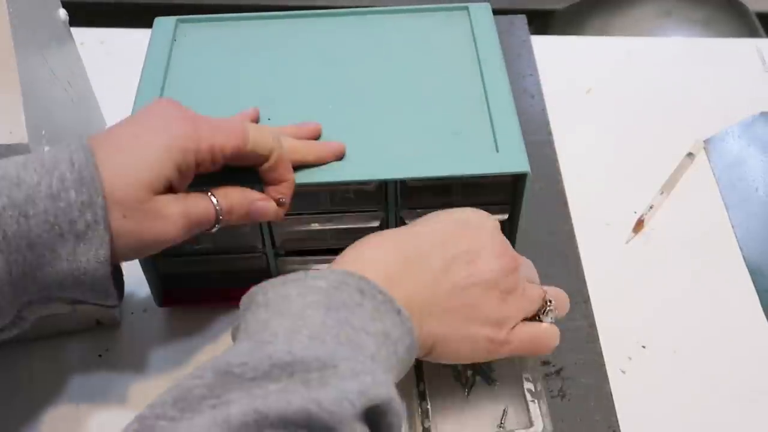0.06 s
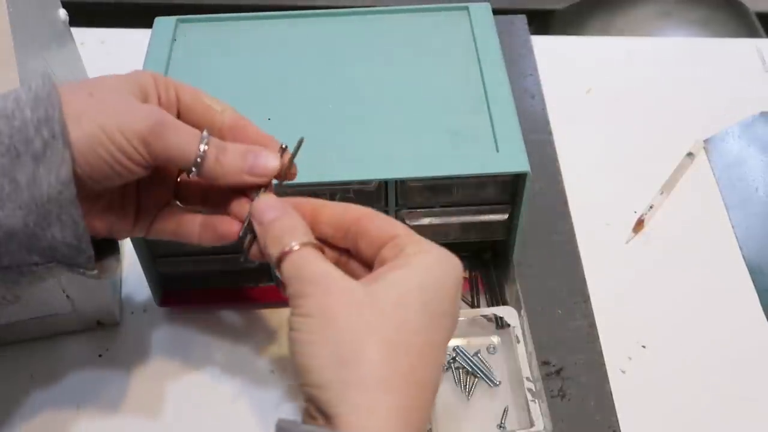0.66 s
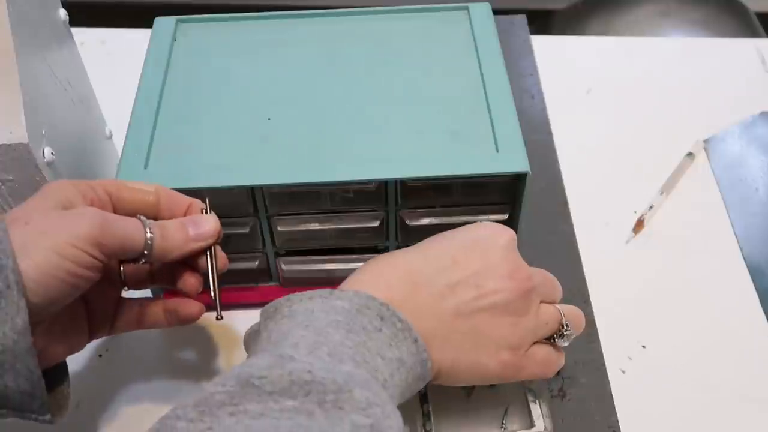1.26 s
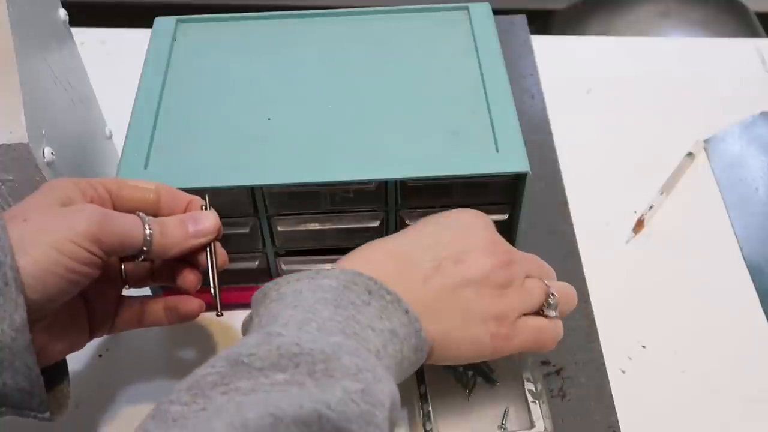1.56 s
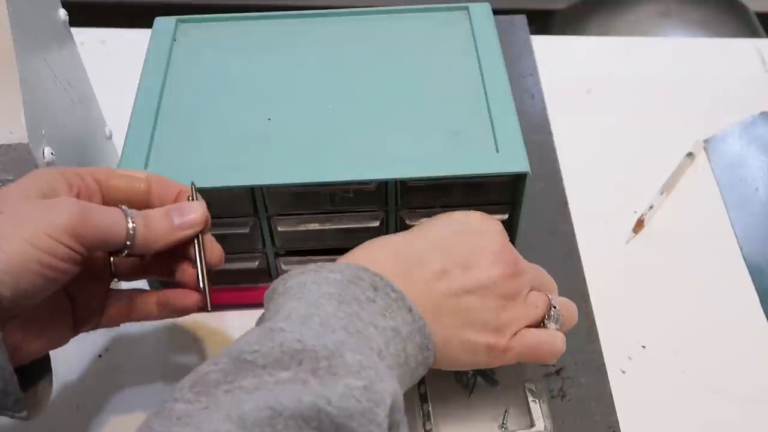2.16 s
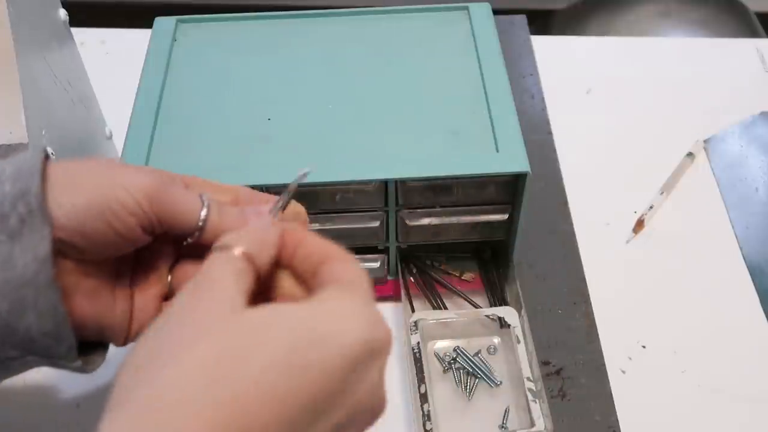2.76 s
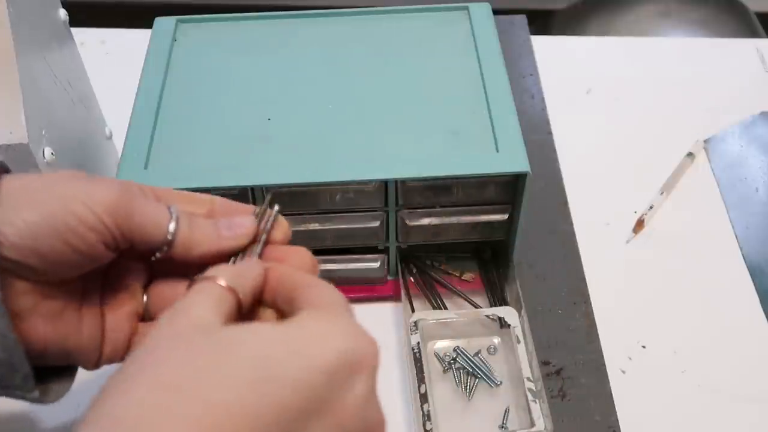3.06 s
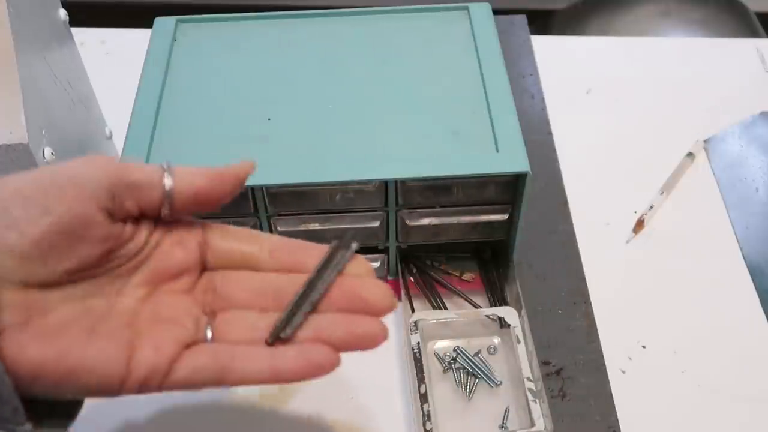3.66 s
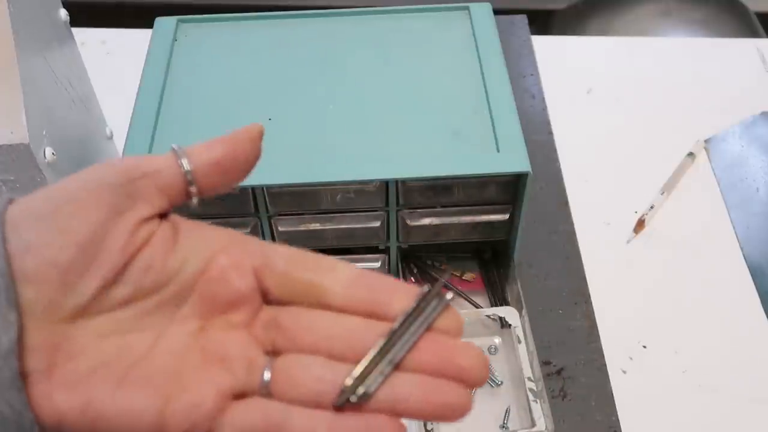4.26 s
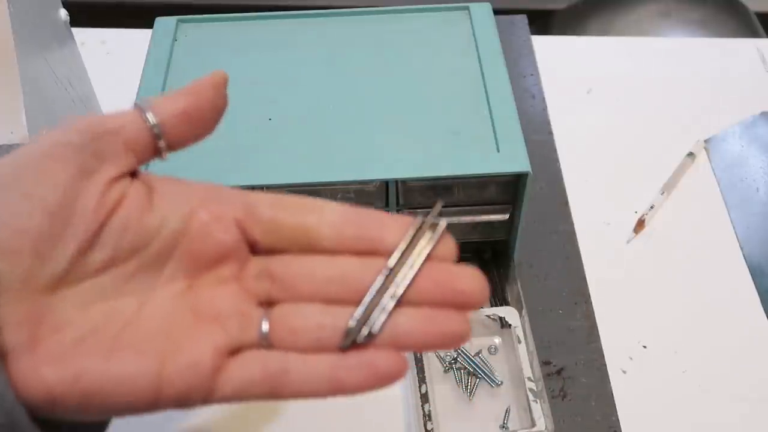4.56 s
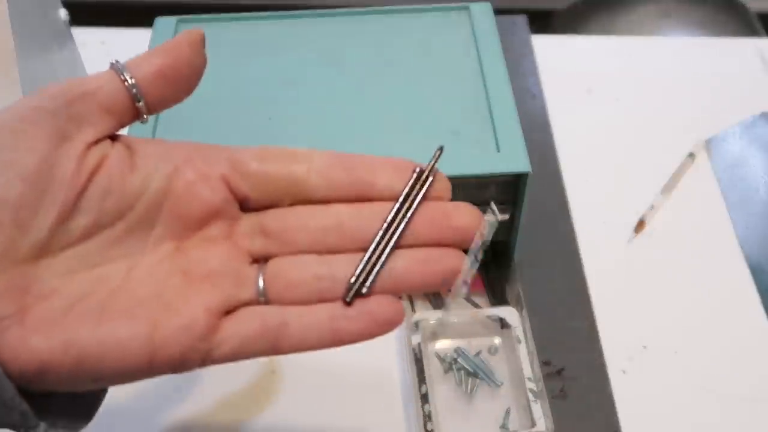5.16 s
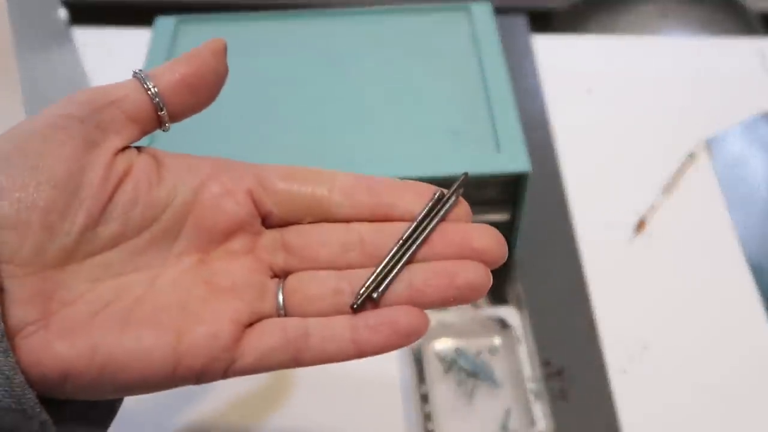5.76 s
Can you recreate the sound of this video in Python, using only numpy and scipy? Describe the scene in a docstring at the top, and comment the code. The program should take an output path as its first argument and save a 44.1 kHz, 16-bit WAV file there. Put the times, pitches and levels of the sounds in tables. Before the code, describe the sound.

A low rumble and faint mains hum run throughout in a small workroom. In the first quarter second, close by, steel nails scrape and click against a small plastic drawer, followed by a soft low thud and a light brush at 0.4 seconds. From 1.1 to 2.3 seconds comes busier rummaging: short scrapes and sharp plastic clacks with dull thuds underneath, strongest around 1.3, 1.75 and 2.05 seconds. Then it turns quiet. Sleeve and skin brush softly near 2.7 and 3.7 seconds, and nails tick faintly together in the palm between 3 and 3.8 seconds. After another soft brush, one nail hits the floor at 5.5 seconds with a loud knock and clink, slightly further off and with more echo. It rings with a thin, high, fluttering tone in the air, lands sharply again at 5.75, and makes several quicker, lighter, metallic bounces until about 6 seconds.

```python
"""A small workroom, with a low rumble and a mains hum. Close by, fingers pick steel nails out of a
small plastic parts drawer: the nails scrape and knock on its walls, with some soft low thuds, and
sleeve and skin brush softly. The nails touch faintly in the palm. Then one slips off, hits the
floor and bounces, ringing as it tumbles through the air."""
import sys
import numpy as np
from scipy import signal
from scipy.fft import rfft, irfft, next_fast_len
from scipy.io import wavfile

SR = 44100
rng = np.random.default_rng(int(sys.argv[2]) if len(sys.argv) > 2 else 0)


def store_pcm(level_fs):
    """Save levels as 16-bit WAV."""
    pcm = np.round(np.clip(level_fs, -1, 1) * 32767).astype(np.int16)
    wavfile.write(sys.argv[1], SR, np.atleast_2d(pcm).T)


N = 265834

# A "peak" is a pitch that stands out; a "decay" is the time a sound takes to fall by 60 dB.
# nails drag along the drawer:
# (start [s], end [s], level [dB], peak [Hz], peak height [dB], steel over plastic [dB])
DRAWER_SCRAPES = [(0, 0.24, -47, 3730, 22, -6.5), (1.088, 1.173, -47, 1470, 3, -13),
                  (1.476, 1.559, -44.5, 1025, 16, -10), (1.688, 1.761, -36, 1650, -2, -14),
                  (1.752, 1.848, -49, 2750, 4, -5), (1.882, 2.045, -48, 1250, 12, -9.5),
                  (2.059, 2.187, -45, 2680, 3, -11), (2.194, 2.317, -54.5, 3160, 11, -11.5)]
# a nail knocks the drawer:
# (time [s], plastic clack [dB], hardness: steel tick over clack [dB], peak [Hz], peak height [dB])
DRAWER_KNOCKS = [(.027, -18, -8, 3850, 16), (.037, -19, -8, 3800, 12), (.1, -5.5, -4, 2150, 26),
                 (0.1015, -11, -1, 3300, 24), (.118, -16, -13, 2200, 27), (0.1722, -12.5, -9, 3700, 29),
                 (0.178, -17, -5, 2100, 20), (0.224, -17.5, -3, 4270, 23), (0.228, -23.5, -8, 1200, 18),
                 (1.117, -19.5, -7.5, 1580, 13), (1.1753, -8.5, -24, 1600, 12),
                 (1.1779, -5.5, -28, 2480, 16), (1.259, -13, -6, 3900, 11), (1.2707, 0.5, -2.5, 1600, 1),
                 (1.2738, -6, -11, 3500, 23), (1.3447, 3.5, -1, 2870, 14), (1.3493, -3.5, -4.5, 3000, 3),
                 (1.484, -21.5, -20, 1040, 28), (1.6753, -18, -14, 2860, 17), (1.695, -12, -20, 2850, 8),
                 (1.7025, -6.5, -23, 1500, 9), (1.7127, -6.5, -25, 2780, 4), (1.7229, -4, -27, 1730, 7),
                 (1.733, -8, -15, 2700, 9), (1.738, -5, -14, 2730, 2), (1.7427, -6, -18, 2870, 14),
                 (1.7472, 1, -5.5, 2820, 5), (1.7622, -10, -15, 1800, 11), (1.773, -14, -11, 1300, 6),
                 (1.7836, -15, -9, 1400, 12), (1.8027, -5.5, -12.5, 1320, 14),
                 (1.8044, -8.5, -14, 2700, 19), (1.8125, -11, -10, 1320, 18),
                 (1.8341, -16.5, -8.5, 2770, 7), (1.918, -19, -20, 2665, 15), (1.949, -15, -24, 2800, 19),
                 (1.973, -13, -19, 2660, 2), (2.012, -16.5, -17, 2950, 5), (2.048, -6.5, -9, 1680, 8),
                 (2.0549, 2, -8.5, 1760, 14), (2.0577, -0.5, -10, 2760, 11), (2.071, -4.5, -22, 1800, 12),
                 (2.091, -14, -11, 2700, 10), (2.108, -8, -12, 2715, 1), (2.2119, -9, -21, 2990, 12.5)]
# soft low thuds, the last while the dropped nail is in the air: (time [s], level [dB], peak [Hz])
LOW_THUDS = [(.084, -17, 457), (0.415, -3, 505), (1.2709, -12, 211), (1.3506, -1, 203), (1.7, -12, 300),
             (1.738, -5.5, 420), (1.9728, -8, 396), (5.688, -21, 220)]
# nails touch each other: (time [s], tick [dB], ring [dB])
NAIL_TOUCHES = [(0.1015, -17.5, -80), (.175, -35, -80), (2.994, -32.5, -85), (3.31, -40, -80),
                (3.555, -50, -69), (3.702, -52, -60), (3.802, -52, -59)]
# sleeve and skin brush: (start [s], end [s], level [dB], middle pitch [Hz])
SOFT_BRUSHES = [(0.377, 0.44, -55, 6800), (2.58, 2.83, -60.5, 595), (3.678, 3.833, -56, 876),
                (5.422, 5.54, -49, 255)]
# the dropped nail lands: (time [s], floor knock [dB], steel clink [dB], rattle decay [s], peak [Hz],
# peak height [dB], slap of the shaft over the knock [dB], high ring afterwards [dB])
NAIL_LANDINGS = [(5.4895, 5.5, -5, 0.015, 8100, 11.5, 4, -32), (5.4925, 4, -21, 0.013, 850, 7, -7, -32),
                 (5.507, -5, -22, 0.04, 2250, 5, -11, -19), (5.761, 3.5, -22, 0.0017, 3150, 14, -12, -39),
                 (5.7634, 7.5, -17, 0.0031, 5600, 10.5, -3.5, -36),
                 (5.775, -.5, -25, 0.0016, 4230, 27, -18, -33),
                 (5.8036, -8, -7, 0.026, 4930, 22, -9, -30.5), (5.881, -9, 0.5, 0.031, 1300, 4, 1, -39),
                 (5.951, -19, -5, 0.017, 1400, 7, -7, -36), (5.958, -7, -0.5, 0.049, 800, 6, -2, -38)]
# the floor booms under the heavier landings: (time [s], level [dB], peak [Hz])
FLOOR_BOOMS = [(5.491, 4.5, 335), (5.764, -3, 160), (5.805, -6, 136), (5.883, -5.5, 136), (5.96, -7, 133)]
# the two tones of a nail bending in the air: (pitch [Hz], decay [s], flutter depth [0-1], flutter [Hz])
NAIL_TONES = [(4368, 2.6, .2, 6.6), (11970, .8, .8, 22.3)]
# tones of the mains hum: (pitch [Hz], level [dB])
HUM_TONES = [(97.5, -53.5), (296, -64)]

# the broad tone colour of each thing: (pitch [Hz], level [dB])
ROOM_AIR = [(20, -7.5), (42, -11), (63, 1.5), (80, -3), (101, -1.5), (125, -5), (204, -6.5), (290, -12.5),
            (360, -13), (700, -20.5), (1290, -24.5), (3000, -30.5), (9140, -43.5), (16000, -54)]
PLASTIC_CLACK = [(200, -23.5), (600, -1), (950, -2.5), (1300, 1.5), (2100, -2), (2900, -0.5), (3700, -9),
                 (5000, -19.5), (8000, -28), (16000, -60)]
DULL_THUD = [(40, -18), (120, -8), (200, -4.5), (300, -2), (480, -4.5), (680, -9), (1000, -30), (3000, -52)]
STEEL_TICK = [(1000, -26.5), (2800, 13), (3800, 14), (4800, 14), (7200, 8.5), (9500, 4), (12000, -2.5),
              (14500, -2), (16000, -34)]
STEEL_CLINK = [(1000, -43), (3300, -23), (4600, 5), (7000, 5), (9000, 0), (10700, 6), (13000, 6),
               (14500, -4), (16000, -12)]
FLOOR_KNOCK = [(150, -26), (420, -2), (750, -6.5), (1100, 1.5), (2000, 2.5), (3300, -2), (4300, -6),
               (5500, -5), (7500, -12.5), (10000, -17.5), (15000, -52)]
DEEP_BOOM = [(40, -13), (90, -17), (135, -3), (220, -8), (350, -4), (550, -2), (800, -3.5), (1400, -18),
             (3000, -67)]
# peaks where each thing likes to ring: (pitch [Hz], width [Hz], height [dB])
DRAWER_PEAKS = [(1227, 52, 2.5), (1507, 78, 2.5), (1810, 70, 5.5), (2650, 200, 3.5), (4530, 290, 1),
                (7070, 280, 3.5)]
CLINK_PEAKS = [(4370, 40, 4), (4940, 60, 6), (6030, 60, 5), (6471, 80, 8), (7370, 66, 7), (9290, 50, 8),
               (10745, 45, 12), (11485, 40, 12), (12080, 80, 9), (13020, 40, 10), (13880, 60, 9),
               (14720, 50, 15), (15600, 60, 14)]
FLOOR_PEAKS = [(297, 20, 6), (361.4, 13, 7.4), (472, 74, 6.4), (673, 37, 2.2), (1085, 40, 3),
               (1690, 51, 1.3), (1960, 140, 2.8), (2280, 110, 1.7), (2740, 39, 2.4)]
# how long the room echoes: (pitch [Hz], decay [s])
ROOM_DECAY = [(100, 0.27), (300, 0.25), (1000, 0.3), (2500, 0.3), (6000, 0.19), (14000, .16)]
# Sounds have two rows: "mid" is what both ears share, "side" is how they differ.
# stereo width of the background and of the action: (pitch [Hz], side over mid [dB])
AIR_WIDTH = [(60, -4.5), (110, -9), (200, -11), (380, -3.5), (700, -5), (1290, -2.5), (2380, -2), (4400, 2),
             (8120, -0.5), (15000, 5)]
ACTION_WIDTH = [(40, -19), (120, -29), (500, -16), (1200, -23.5), (2400, -16), (4500, -9.5), (8000, -3),
                (12000, 1)]

SIZE = 16384  # samples in one short sound
T = np.arange(N) / SR
AGE = T[:SIZE]  # seconds since a short sound began
PITCHES = np.arange(SIZE // 2 + 1) * SR / SIZE  # Hz


def undb(db):
    """Turn decibels into a number to multiply by."""
    return 10 ** (np.asarray(db) / 20)


def unit(x):
    """Scale each row to an energy of one."""
    return x / np.sqrt(np.sum(x ** 2, axis=-1, keepdims=True))


def along(points, hz):
    """Read between the rows of a pitch table, giving each octave equal space."""
    pitch, value = np.transpose(points)
    return np.interp(np.log(hz + 1), np.log(pitch), value)


def response(colour, peaks=()):
    """The sound an object with this colour and these peaks makes after one perfect tap."""
    gain = undb(along(colour, PITCHES))
    for hz, width, db in peaks:
        gain = gain * (1 + (undb(db) - 1) / np.hypot(1, 2 * (PITCHES - hz) / width) ** 2)
    # keep the colour, but make all of the sound come after the tap
    cepstrum = irfft(np.log(gain))
    cepstrum[1:SIZE // 2] *= 2
    cepstrum[SIZE // 2 + 1:] = 0
    return irfft(np.exp(rfft(cepstrum)))


def through(x, body):
    """Play x through an object's response, keeping the length."""
    return signal.fftconvolve(np.atleast_2d(x), np.atleast_2d(body), axes=-1)[:, :x.shape[-1]]


def add(out, start, x):
    """Mix x into out at a start time in seconds."""
    i = max(int(start * SR), 0)
    out[:, i:i + x.shape[-1]] += x[..., :N - i]


def fade(decay):
    """Die away by 60 dB in decay seconds."""
    return np.exp(-np.log(1000) * AGE / np.maximum(decay, 1e-3))


def hit(body, decay, snap):
    """One contact of strength snap, then a dying chatter of tiny ones, makes an object ring."""
    chatter = rng.standard_normal((2, SIZE)) * undb(3.0 * rng.standard_normal(SIZE))
    force = unit(chatter * fade(decay) * (1 - fade(0.0087)))
    force[0, 0] += snap
    return unit(through(force, body))


def room(x, echo_db, build_s):
    """The walls answer with a wash of echoes that builds up, then dies soonest in the treble."""
    noise, tail = rfft(rng.standard_normal((2, SIZE))), 0
    centres, decays = np.transpose(ROOM_DECAY)
    for decay, share in zip(decays, np.eye(len(centres))):
        band = np.interp(np.log(PITCHES + 1), np.log(centres), share)
        tail = tail + irfft(noise * band) * fade(decay)
    build_up = 1 - np.exp(-(AGE / build_s) ** 2)
    return undb(echo_db) * through(x[0], unit(tail * build_up))


def stereo(x, width):
    """Turn mid and side into left and right, which differ most in the treble."""
    size = 2 * next_fast_len(N)
    hz = np.arange(size // 2 + 1) * SR / size
    side = irfft(rfft(x[1], size) * undb(along(width, hz)))[:N]
    return x[0] + np.array([[1], [-1]]) * side


def rumble_and_hum():
    """The room air rumbles, its level wandering a little, under a steady mains hum."""
    air_db, wander_db = -46.5, 1.8
    air = through(rng.standard_normal((2, N + SIZE)), response(ROOM_AIR))[:, SIZE:]
    wander = np.interp(T, np.linspace(0, T[-1], num=30), rng.standard_normal(30))
    mid, side = np.sqrt(N) * unit(air) * undb(air_db + wander_db * wander)
    hum = sum(np.sqrt(2) * undb(db) * np.sin(2 * np.pi * (hz * T + rng.random())) for hz, db in HUM_TONES)
    return np.array([mid + hum, side])


def scrapes():
    """A dragged nail catches and slips, sending a stream of uneven clicks into drawer and cabinet."""
    out, slips_per_s = np.zeros((2, N)), 1200
    for start, end, db, hz, peak_db, steel_db in DRAWER_SCRAPES:
        progress = np.minimum(AGE / (end - start), 1)
        pressure = np.sqrt(np.sin(np.pi * np.sqrt(progress)).clip(0))  # bites early, then eases
        slipping = rng.random(SIZE) < slips_per_s / SR
        slips = slipping * rng.standard_normal((2, SIZE)) * undb(2.0 * rng.exponential(size=SIZE))
        wall = unit(response(PLASTIC_CLACK, DRAWER_PEAKS + [(hz, hz / 5, peak_db)]))
        cabinet = undb(1.0) * unit(response(DULL_THUD))
        steel = undb(steel_db) * unit(response(STEEL_TICK))
        force = np.sqrt(SIZE) * unit(slips) * pressure
        add(out, start, undb(db) * through(force, unit(wall + cabinet + steel)))
    return out


def jostles():
    """A dragged nail jostles its neighbours: extra rows of random knocks, louder in a louder scrape."""
    per_s, above_scrape_db, scatter_db = 30, 15.5, 10.5
    peak_hz, peak_db = 2740, 1
    rows = []
    for start, end, db, *_, steel_db in DRAWER_SCRAPES:
        count = max(int((end - start) * per_s), 1)
        for k, (place, strength) in enumerate(rng.random((count, 2))):
            time = start + (end - start) * (k + place) / (count + 1)
            clack_db = db + above_scrape_db + scatter_db * (2 * strength - 1)
            rows.append((time, clack_db, steel_db, peak_hz, peak_db))
    return rows


def knocks():
    """A nail rings the drawer wall and shakes the cabinet; the open drawer aims one peak forward."""
    near, into_room = np.zeros((2, 2, N))
    cabinet = response(DULL_THUD)
    steel, wall = response(STEEL_TICK, DRAWER_PEAKS), response(PLASTIC_CLACK, DRAWER_PEAKS)
    for time, clack_db, hardness_db, hz, peak_db in DRAWER_KNOCKS + jostles():
        decay = 0.03 * 2 ** (hardness_db / 57 - clack_db / 38)  # harder or lighter knocks rattle longer
        thud_db = clack_db - 5.5 + 0.45 * hardness_db
        aimed = response(PLASTIC_CLACK, DRAWER_PEAKS + [(hz, 420, peak_db)])
        tick = undb(clack_db + hardness_db) * hit(steel, decay, snap=0.43)
        thud = undb(thud_db) * hit(cabinet, decay=0.061, snap=0.78)
        add(near, time, tick + thud + undb(clack_db) * hit(aimed, decay, snap=0.83))
        add(into_room, time, tick + thud + undb(clack_db - 2.5) * hit(wall, decay, snap=0.98))
    return near + room(into_room, echo_db=-8.0, build_s=0.0089)


def low_thuds():
    """Soft low thuds, each at its own pitch: some alone, some under the harder nail knocks."""
    out, peak_db = np.zeros((2, N)), 7
    for time, db, hz in LOW_THUDS:
        body = response(DULL_THUD, [(hz, hz / 3, peak_db)])
        add(out, time, undb(db) * hit(body, decay=0.034, snap=0.64))
    return out


def touches():
    """Nails meet in the fingers or the palm; skin quickly stops their ring."""
    out, steel, ring_hz = np.zeros((2, N)), response(STEEL_CLINK), 12130
    ring = np.sin(2 * np.pi * ring_hz * AGE) * fade(0.13)
    for time, tick_db, ring_db in NAIL_TOUCHES:
        add(out, time, undb(tick_db) * hit(steel, decay=0.011, snap=.6) + undb(ring_db) * ring)
    return out


def brushes():
    """Cloth and skin rub, making soft swells of noise."""
    out = np.zeros((2, N))
    for start, end, db, hz in SOFT_BRUSHES:
        count = int((end - start) * SR)
        band = signal.butter(2, [hz / 2.5, min(hz * 2.5, SR / 3)], "bandpass", fs=SR, output="sos")
        rubbing = signal.sosfilt(band, rng.standard_normal((2, count)))
        swell = np.sin(np.pi * np.arange(count) / count)
        add(out, start, undb(db) * np.sqrt(count) * unit(rubbing * swell))
    return out


def landings():
    """Hard early landings sound the floor, each spot with its own peak; later ones are mostly steel."""
    out, steel = np.zeros((2, N)), response(STEEL_CLINK, CLINK_PEAKS)
    shaft_lag_s, boom_peak_db = .0016, 11  # the tip lands first, then the shaft slaps down
    for time, knock_db, clink_db, decay, hz, peak_db, shaft_db, _ in NAIL_LANDINGS:
        floor = response(FLOOR_KNOCK, FLOOR_PEAKS + [(hz, hz / 4, peak_db)])
        snap = 0.0029 / decay  # a very short rattle is mostly one sharp contact
        add(out, time, undb(knock_db) * hit(floor, decay, snap))
        add(out, time, undb(clink_db) * hit(steel, decay, snap=0.25))
        add(out, time + shaft_lag_s, undb(knock_db + shaft_db) * hit(floor, decay, snap))
    for time, db, hz in FLOOR_BOOMS:
        floor = response(DEEP_BOOM, FLOOR_PEAKS + [(hz, hz / 3, boom_peak_db)])
        add(out, time, undb(db) * hit(floor, decay=0.045, snap=0.73))
    return out


def flights():
    """Between landings the nail rings freely; its spin and its rise and fall make the ring flutter."""
    out = np.zeros((2, N))
    gravity, sound_speed, floor_echo = 9.81, 343, .28  # m/s^2, m/s, share bounced back
    ends = [row[0] for row in NAIL_LANDINGS[1:]] + [T[-1]]
    for (start, *_, high_db), end in zip(NAIL_LANDINGS, ends):
        time_left = np.maximum(end - start - AGE, 0)
        height = gravity / 2 * AGE * time_left
        lag = height / sound_speed  # a changing travel time bends the pitch
        airborne = np.minimum(AGE / 0.005, 1) * np.minimum(time_left / 0.0019, 1)
        low_db = -36.5 + 0.22 * high_db  # the low tone follows the high one
        for (hz, decay, depth, flutter_hz), db in zip(NAIL_TONES, (low_db, high_db)):
            # a quarter turn between mid and side keeps left and right equally loud
            phase = 2 * np.pi * rng.random((2, 1, 1)) + np.array([[0], [np.pi / 2]])
            direct = np.sin(2 * np.pi * hz * (AGE + lag) + phase[0])
            off_floor = floor_echo * np.sin(2 * np.pi * hz * (AGE - lag) + phase[1])
            spin = 1 - depth + depth * np.cos(2 * np.pi * flutter_hz * AGE)
            add(out, start, undb(db) * airborne * fade(decay) * spin * (direct + off_floor))
    return out


def scene():
    """Mix it all: the drawer is near, with little echo; the floor is further off, with more."""
    handling = scrapes() + touches() + brushes()
    thuds, bounces, ring = low_thuds(), landings(), flights()
    bench = knocks() + handling + room(handling, echo_db=-5.5, build_s=0.0099)
    bench += thuds + room(thuds, echo_db=-7.5, build_s=0.005)
    fall = bounces + room(bounces, echo_db=-5.0, build_s=0.0079)
    fall += ring + room(ring, echo_db=-7.0, build_s=0.043)
    return stereo(bench + fall, ACTION_WIDTH) + stereo(rumble_and_hum(), AIR_WIDTH)


def record(dry):
    """Round off the very loudest moments and cut the highest treble."""
    ceiling, top_hz = .85, 16200
    rounded = dry / (1 + (dry / ceiling) ** 4) ** (1 / 4)
    return signal.sosfilt(signal.ellip(8, .2, 80, top_hz, fs=SR, output="sos"), rounded)


dry = scene()
out = record(dry)
store_pcm(out)
```